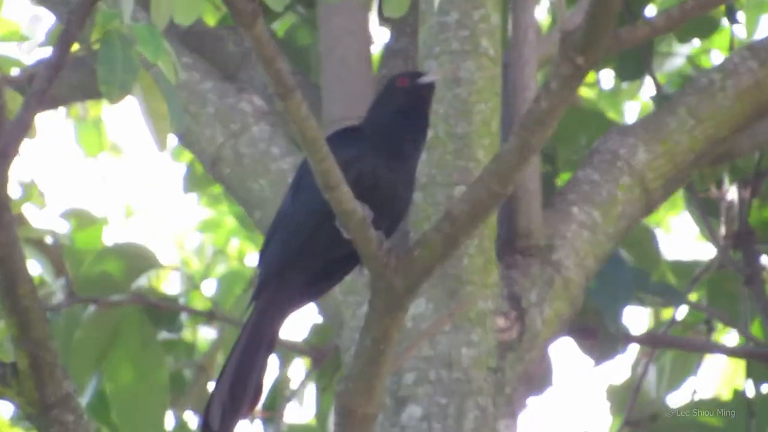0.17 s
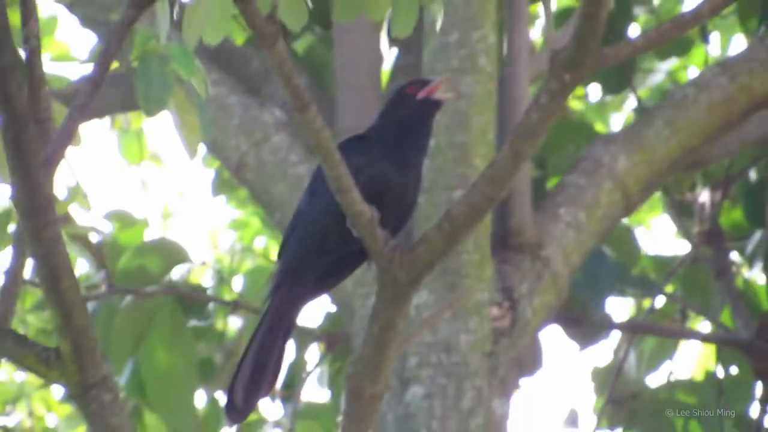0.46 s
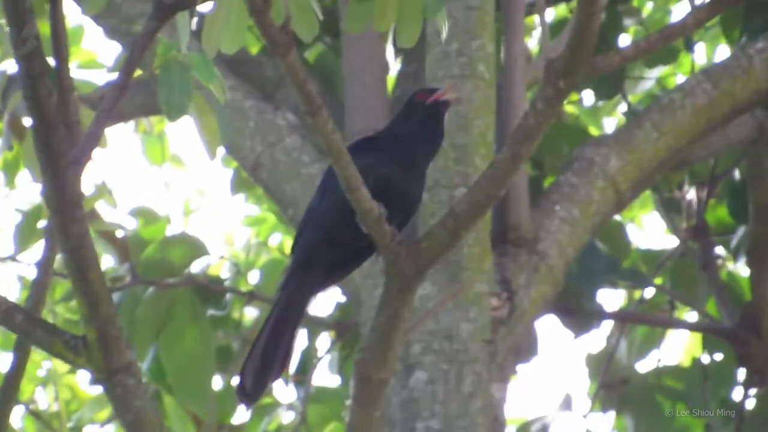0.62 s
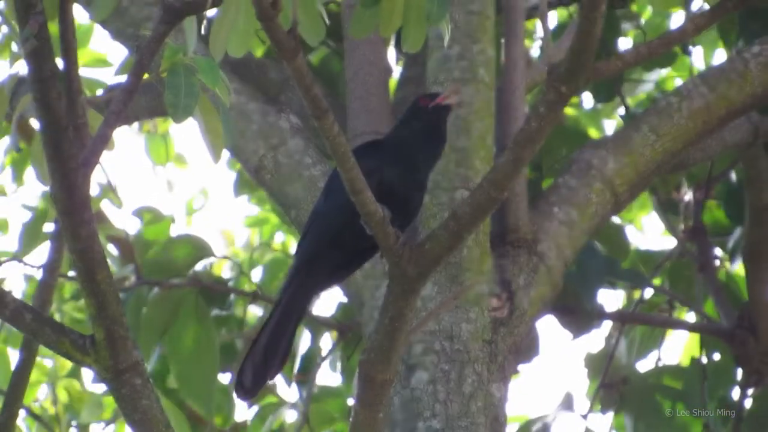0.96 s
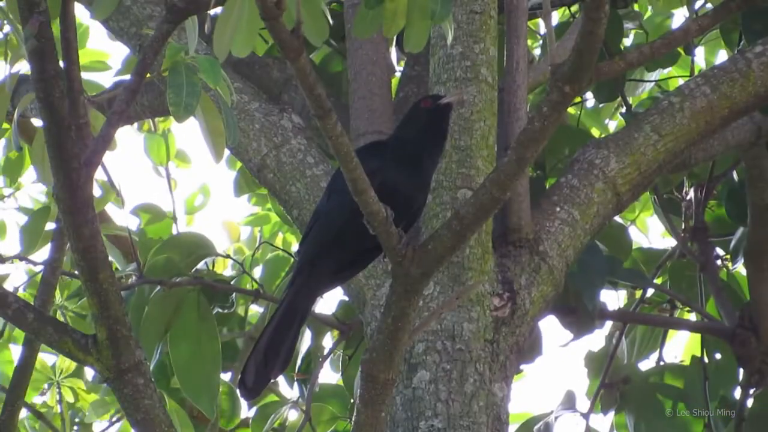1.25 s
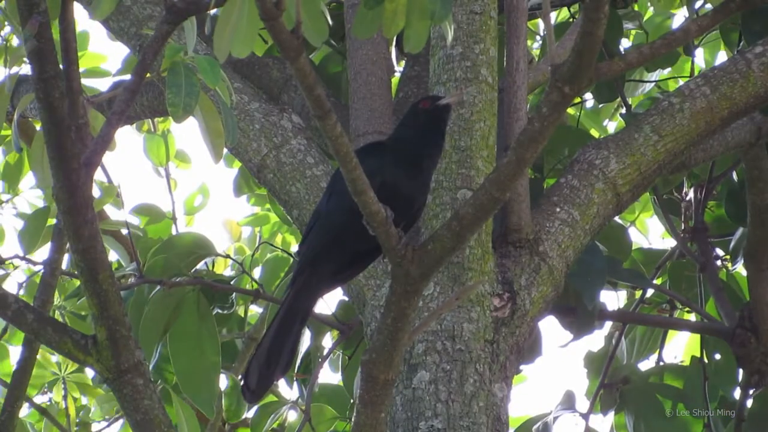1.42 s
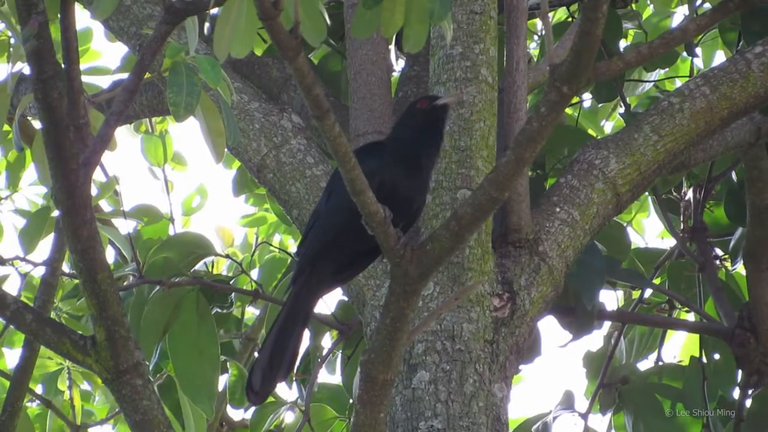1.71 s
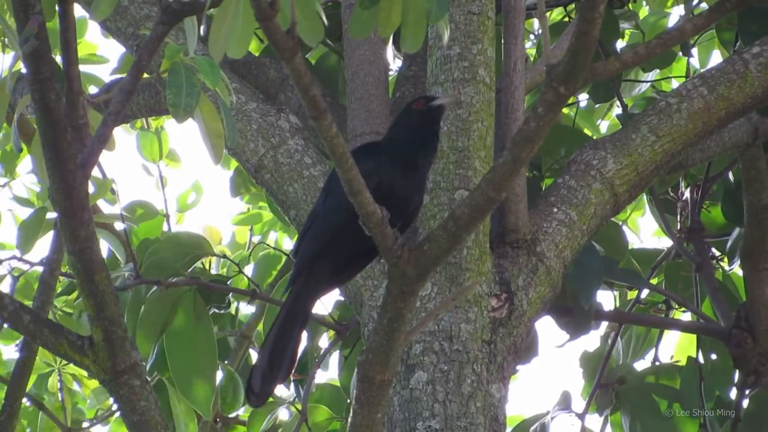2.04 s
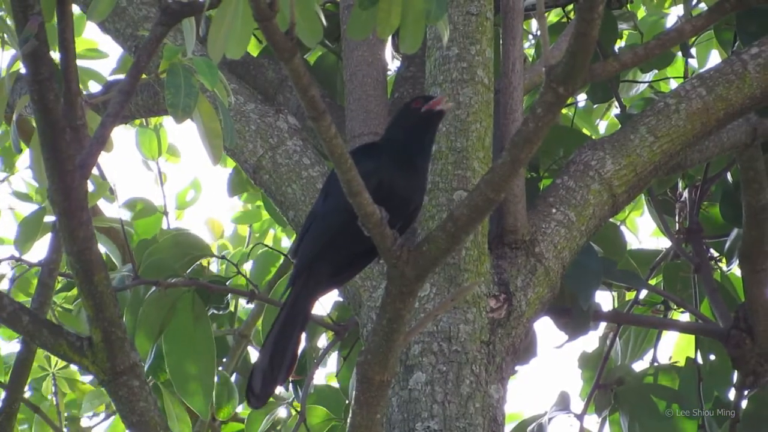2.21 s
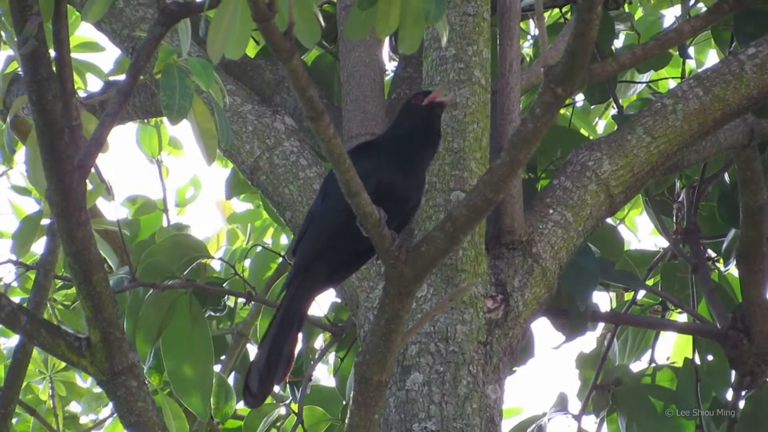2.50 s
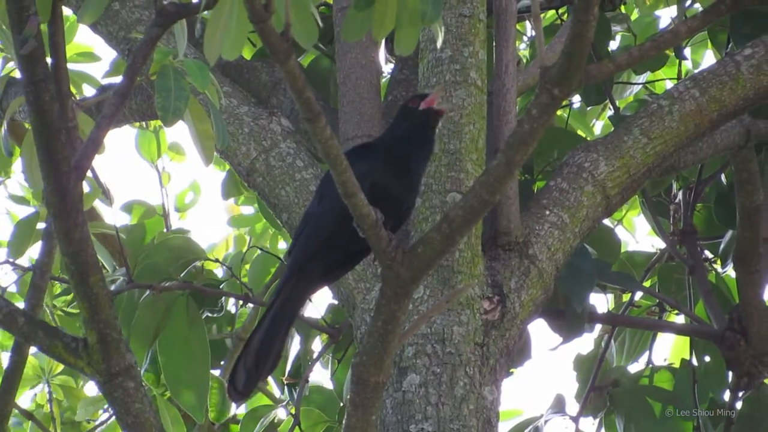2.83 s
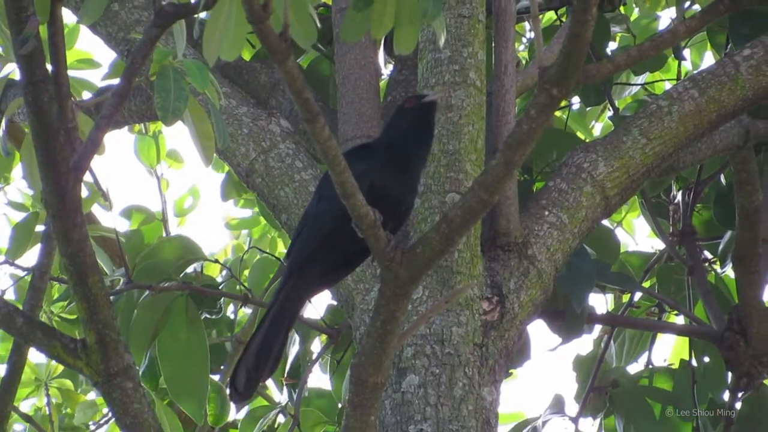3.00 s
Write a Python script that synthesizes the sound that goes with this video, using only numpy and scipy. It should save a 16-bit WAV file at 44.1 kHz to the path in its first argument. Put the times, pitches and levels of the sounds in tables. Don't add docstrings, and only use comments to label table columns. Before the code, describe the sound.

A bird whistles two loud rising-then-falling calls from a tree over rumbling traffic and idling engine

```python
import sys
import numpy as np
from scipy import signal
from scipy.fft import rfft, irfft
from scipy.io import wavfile
from scipy.ndimage import uniform_filter1d

SR = 44100
rng = np.random.default_rng(int(sys.argv[2]) if len(sys.argv) > 2 else 0)


def volts_from_db(level):
    exponent = np.asarray(level, float) / 20
    return 10 ** exponent


def pcm_store(signal):
    levels = np.round(np.clip(np.atleast_2d(signal), -1, 1) * 32767)
    wavfile.write(sys.argv[1], SR, levels.astype(np.int16).T)


N = 139356
T = np.arange(N) / SR


def evened(x):
    return x / np.sqrt(np.mean(x ** 2) + 1e-20)


def read(points, hz):
    f, value = np.transpose(points)
    return np.interp(np.log(hz + 1), np.log(f + 1), value)


def drift(rate_hz, t=T):
    rates_hz = np.geomspace(rate_hz / 20, rate_hz, 16)
    return evened(sum(np.sin(2 * np.pi * (f * t + rng.random())) / np.sqrt(f) for f in rates_hz))


def wind():
    # centre in seconds, level in dB, frequency in Hz.
    puffs = [(0.007, -7.5, 66.3), (0.057, -7, 64), (0.196, -10, 60.0), (0.706, -8, 104), (0.733, -9, 83.0),
             (0.808, -11, 91.5), (0.833, -11.1, 65.0), (0.982, -1, 70.0), (1.033, -3, 104.9),
             (1.064, -6, 83.0), (1.149, 0, 137.4), (1.4, -6.3, 102.0), (1.47, -5, 86.0),
             (2.045, -3.5, 123.2), (2.102, -9, 85.0)]
    breeze_db, gust_db, breeze_hz = -27, 3, 60
    puff_db, puff_turns, left_db = 0.5, 0.31, 1.4
    low = signal.butter(4, breeze_hz, fs=SR, output="sos")
    breeze = evened(signal.sosfilt(low, np.diff(rng.standard_normal(N + 1))))
    push = volts_from_db(breeze_db + gust_db * drift(2.69)) * breeze
    for (s, db, hz), phase in zip(puffs, rng.random(len(puffs))):
        turns = (T - s) * hz
        swell = np.exp(-.5 * (turns / puff_turns) ** 2)
        push = push + volts_from_db(db + puff_db) * swell * np.cos(2 * np.pi * (turns + phase))
    return push * [[volts_from_db(left_db)], [-volts_from_db(-left_db)]]


def road():
    # time in seconds, nearness of passing tyres in dB, far rumble in dB.
    traffic = [(0, -45, 1), (.15, -45, -1), (.3, -45.5, 2.5), (.5, -42.5, 3.5), (.8, -43.5, 0.5),
               (1.2, -41, -2.5), (1.43, -37.5, 0.5), (1.455, -34.5, -2.5), (1.58, -38.5, -0.5),
               (1.7, -36, 2), (1.82, -36.5, 2.5), (1.89, -39.5, 0.5), (1.95, -36.5, 0), (2.05, -39, 0.5),
               (2.5, -40.5, -1), (2.9, -41.5, -2), (3.05, -45, -1), (3.16, -45.5, -2.5)]
    # frequency in Hz, level in dB per Hz.
    rumble_shape = [(12, -43), (20, -11.5), (79, -4.5), (415, -14.5), (1000, -18.5), (1290, -17.5),
                    (1560, -21), (11700, -55.5), (14500, -66)]
    tyre_shape = [(290, -31), (500, -6.5), (1860, -7.5), (2360, -6), (3170, -12.5), (4980, -12.5),
                  (8160, -17.5), (13200, -18.5), (14500, -34)]
    # centre in seconds, half length in seconds, frequency in Hz, width in Hz, level in dB.
    whines = [
        (1.786, 0.12, 2340, 290, -24),
        (1.9, 0.018, 10500, 1800, -32),
        (1.51, 0.19, 4940, 260, -37),
        (0.19, 0.04, 840, 220, -24),
        (.07, 0.054, 440, 200, -29),
        (1.6, 0.039, 9800, 900, -39),
        (0.97, 0.14, 1280, 240, -26.5),
        (1.02, 0.022, 2650, 160, -30),
        (1.22, 0.22, 2680, 440, -29),
        (1.39, 0.16, 1160, 554, -21.5),
    ]
    # frequency in Hz, likeness of the ports from 0 to 1.
    port_likeness = [(40, 0.94), (130, 0.64), (400, 0.84), (1200, 0.58), (5000, 0.71), (12000, 0.44)]
    # frequency in Hz, left over right in dB.
    port_lean = [(60, -2), (230, 5), (920, -1.5), (3600, -3), (14100, 1.5)]
    rumble_db, tyres_up_db = -21, 15
    air_loss = 0.41
    lead_s = 4.2e-5

    frames, hz = N // 256 + 5, np.fft.rfftfreq(1024, 1 / SR)[:, None]
    t = np.arange(frames) * 256 / SR
    a, b, c, d, patches = rng.standard_normal((frames, 513, 5)).T
    patches = uniform_filter1d(patches, size=20, axis=0)
    patches = evened(uniform_filter1d(patches, size=8, axis=1))
    flicker = evened(uniform_filter1d(rng.standard_normal(frames), size=3)) * np.clip(hz / 6000, 0, 1)

    s, near_db, far_db = np.transpose(traffic)
    nearness_db = np.interp(t, s, near_db)
    far = volts_from_db(rumble_db + np.interp(t, s, far_db)) * evened(volts_from_db(read(rumble_shape, hz)))
    air_db = air_loss * hz / 9600 * (nearness_db - near_db.max())
    tyres = volts_from_db(tyres_up_db + nearness_db + air_db) * evened(volts_from_db(read(tyre_shape, hz)) * (hz > 500))
    whine = 0
    for at, half, f_hz, width_hz, db in whines:
        band = evened(np.exp(-.5 * ((hz - f_hz) / width_hz) ** 2))
        whine = whine + volts_from_db(db) * np.exp(-.5 * ((t - at) / half) ** 2) * band
    level = np.sqrt(far ** 2 + tyres ** 2 + whine ** 2) * volts_from_db(1.17 * patches + 1.3 * flicker)

    same = read(port_likeness, hz)
    left = a + 1j * b
    lag = np.exp(2j * np.pi * hz * lead_s * np.clip((nearness_db + 51.5) / 14, 0, 1))
    right = same * left * lag + np.sqrt(1 - same ** 2) * (c + 1j * d)
    lean = volts_from_db(read(port_lean, hz) / 2)
    z = np.array([left * lean, right / lean]) * level
    return signal.istft(z, nperseg=1024, noverlap=768)[1][:, :N] / np.sqrt(768)


def stack(table, orders, wobble, wobble_hz, lump_db):
    s, hz, db = np.transpose(table)
    turn = 2 * np.pi * np.cumsum(np.interp(T, s, hz) * (1 + wobble * drift(wobble_hz))) / SR
    tones = 0
    for k, d in orders:
        tones = tones + volts_from_db(d + lump_db * drift(wobble_hz)) * np.sin(k * turn + 2 * np.pi * rng.random())
    return np.sqrt(2) * volts_from_db(np.interp(T, s, db)) * tones * volts_from_db([[2.5], [-3]])


def idling_diesel():
    # time in seconds, firing rate in Hz, level in dB.
    idle_curve = [(0, 77.16, -26.5), (.5, 75.87, -21.5), (.8, 75.6, -25.5), (1.2, 75.47, -21),
                  (1.8, 74.5, -19.5), (2.1, 73.7, -26.5), (2.5, 75.21, -20.5), (3.16, 75.46, -32)]
    # multiple of the firing rate, level in dB.
    idle_orders = [(.5, -19), (1, -0.5), (2, -11.5), (2.5, -16.5), (3, -14), (4.5, -20), (7, -21.5)]
    return stack(idle_curve, idle_orders, 0.00352, 5.99, lump_db=-1.5)


def second_engine():
    # time in seconds, firing rate in Hz, level in dB.
    pull_curve = [(0, 104.4, -33), (.5, 100.8, -28.5), (.65, 104, -42), (1.9, 95, -51), (2.1, 94.1, -27.5),
                  (2.45, 102.9, -24.5), (2.7, 114, -24.5), (3.16, 114.6, -32.5)]
    # multiple of the firing rate, level in dB.
    pull_orders = [(1, -0.5), (1.65, -10.5), (2, -15.5)]
    return stack(pull_curve, pull_orders, 0.018, 16, lump_db=2)


def far_chirps():
    # start in seconds, length in seconds, from Hz, to Hz, level in dB.
    chirp_rows = [
        (.703, .03, 2800, 3130, -38),
        (.73, .06, 3130, 2720, -34),
        (2.245, .05, 3900, 3100, -37),
        (2.545, .035, 3850, 3100, -42),
        (2.675, .025, 3300, 2700, -43),
    ]
    out = np.zeros(N)
    for start, length, from_hz, to_hz, db in chirp_rows:
        u = np.clip((T - start) / length, 0, 1)
        turns = length * u * (from_hz + (to_hz - from_hz) * u / 2)
        out += volts_from_db(db) * np.sqrt(2 * np.sin(np.pi * u)) * np.sin(2 * np.pi * turns)
    return out


def twigs():
    # start in seconds, frequency in Hz, level in dB, T60 in seconds.
    tick_rows = [
        (.0445, 1500, -19, .03),
        (.0438, 4800, -23, .015),
        (.033, 6000, -30, .02),
        (.0715, 3000, -24, .012),
        (.064, 1800, -22, .02),
        (.678, 11800, -29, .012),
        (.678, 14200, -32, .008),
        (.678, 10000, -33, .008),
    ]
    # start in seconds, level in dB, T60 in seconds.
    snap_rows = [
        (.0003, -34, .02),
        (.0436, -30, .022),
        (.065, -41, .03),
        (.202, -43, .04),
    ]
    out = np.zeros(N)
    for start, hz, db, t60_s in tick_rows:
        t = np.maximum(T - start, 0)
        out += volts_from_db(db - 60 * t / t60_s) * np.sin(2 * np.pi * hz * t)
    band = signal.butter(2, (2500, 11000), "band", fs=SR, output="sos")
    crack = signal.sosfilt(band, rng.standard_normal(N))
    for start, db, t60_s in snap_rows:
        out += volts_from_db(db - 60 * np.maximum(T - start, 0) / t60_s) * (T >= start) * crack
    return out


def grove(x):
    t60_s = .6
    t = np.arange(SR // 2) / SR
    sparse = rng.random((2, len(t))) < .05
    taps = rng.standard_normal((2, len(t))) * sparse * volts_from_db(-60 * t / t60_s) * (t > .02)
    taps = signal.lfilter([1], [1, -.7], taps + 0.4 * taps[::-1])
    return signal.fftconvolve(x[None], taps / np.linalg.norm(taps[0]) / 2, axes=1)[:, :N]


def whistle(note, beak, lowest):
    # multiple of the pitch, level under the fundamental in dB.
    overtones = [(2, -31), (3, -40), (4, -47), (5, -45), (6, -45), (7, -52), (8, -44), (9, -56)]
    # frequency in Hz, width in Hz, dB over the rest.
    windpipe = [(3420, 150, 5), (4900, 800, 20), (10100, 400, 11), (11750, 450, 15), (12900, 600, 8)]
    waver, edge_s, high_share = .002, .003, .6
    s, hz, db = np.transpose(note)
    span = slice(round(s[0] * SR) - 200, round(s[-1] * SR) + 200)
    t = T[span]
    pitch_hz = uniform_filter1d(np.interp(t, s, hz), size=200) * (1 + waver * drift(60, t))
    turn = 2 * np.pi * np.cumsum(pitch_hz) / SR
    level_db = np.interp(t, s, db)
    beak_db = np.interp(t, *np.transpose(beak))

    bright = 0
    for k, d in overtones[lowest - 2:]:
        pipe_db = sum(up_db * np.exp(-.5 * ((k * pitch_hz - f_hz) / width_hz) ** 2)
                      for f_hz, width_hz, up_db in windpipe)
        open_db = beak_db * (1 if k == 3 else high_share)
        flutter_db = 1.2 * drift(70, t) + 3.73 * drift(500, t)
        bright = bright + volts_from_db(d + pipe_db + open_db + flutter_db) * np.sin(k * turn)
    bright = bright * volts_from_db(uniform_filter1d(level_db, size=2000))

    pure = volts_from_db(uniform_filter1d(level_db, size=150)) * np.sin(turn)
    gate = np.clip(np.minimum(t - s[0], s[-1] - t) / edge_s + .5, 0, 1)
    out = np.zeros(N)
    out[span] = np.sqrt(2) * gate * (pure + bright)
    return out


def bird():
    # time in seconds, pitch in Hz, level in dB.
    low_notes = [
        [(.553, 1262, -37), (.563, 1247, -21), (.572, 1216, -16), (.585, 1217, -11.5), (.612, 1161, -17),
         (.65, 1145, -15), (.735, 1146, -16), (.752, 1174, -22.5)],
        [(2.465, 1317, -29), (2.49, 1274, -23), (2.53, 1225, -13.5), (2.57, 1202, -14.5), (2.595, 1210, -14),
         (2.625, 1200, -14), (2.645, 1247, -25)],
    ]
    rise_1 = [(0.749, 1345, -23.5), (0.792, 1410, -25), (0.826, 1470, -31), (0.843, 1514, -25.5),
              (.873, 1599, -19), (0.885, 1614, -28), (0.909, 1634, -22), (0.952, 1659, -19.5),
              (.975, 1628, -17)]
    fall_1 = [(1.001, 1510, -26), (1.022, 1410, -22), (1.038, 1337, -27), (1.05, 1285, -35),
              (1.078, 1200, -33), (1.095, 1160, -44)]
    rise_2 = [(2.632, 1383, -23.5), (2.67, 1445, -26.5), (2.696, 1473, -34), (2.73, 1571, -18.5),
              (2.76, 1637, -29), (2.789, 1678, -17.5), (2.83, 1720, -17), (2.85, 1740, -15.5),
              (2.859, 1740, -16)]
    fall_2 = [(2.848, 1610, -22), (2.863, 1562, -13), (2.872, 1540, -31.5), (2.886, 1440, -12.5),
              (2.905, 1360, -11.5), (2.918, 1270, -25), (2.935, 1221, -12.5), (2.954, 1160, -18),
              (2.972, 1150, -20), (2.985, 1190, -29), (3.005, 1180, -42)]
    # time in seconds, opening in dB.
    beak_opening = [
        [(.553, 12), (.585, 8), (.63, -40)],
        [(2.465, -40), (2.645, -40)],
        [(.749, 7), (.83, 4), (.858, 6), (.872, 1), (.89, 14), (.92, 8), (.946, -2), (.966, 12), (.985, -2),
         (1.04, 0), (1.09, -16)],
        [(2.632, 3), (2.655, 4), (2.672, 9), (2.698, 9), (2.718, 10), (2.758, 8), (2.771, 0), (2.792, 4),
         (2.816, -3), (2.83, 3), (2.859, 1)],
        [(2.848, -4), (2.87, -14), (2.9, -20)],
    ]
    lowest_multiple = (7, 7, 2, 2, 2)
    pan_db, echo_db = .3, -17
    notes = [*low_notes, [*rise_1, *fall_1], rise_2, fall_2]
    song = sum(whistle(*call) for call in zip(notes, beak_opening, lowest_multiple))
    return song * volts_from_db([[pan_db / 2], [-pan_db / 2]]) + volts_from_db(echo_db) * grove(song)


def scene():
    engines = idling_diesel() + second_engine()
    return wind() + road() + engines + far_chirps() + twigs() + bird()


def roll_off(x):
    return signal.sosfilt(signal.butter(12, 14690, fs=SR, output="sos"), x)


def record(dry):
    # frequency in Hz, width in Hz, depth from 0 to 1.
    mic_dips = [(3950, 110, .7), (7900, 35, .85)]
    low_cut_hz, ceiling = 22, .9
    hz = np.fft.rfftfreq(N, 1 / SR)
    gain = 1 / np.sqrt(1 + (low_cut_hz / (hz + 1)) ** 4)
    for f_hz, width_hz, depth in mic_dips:
        gain = gain * (1 - depth * np.exp(-.5 * ((hz - f_hz) / width_hz) ** 2))
    mix = np.clip(irfft(rfft(dry) * gain, N), -ceiling, ceiling)
    return roll_off(mix)


dry = scene()
out = record(dry)
pcm_store(out)
```